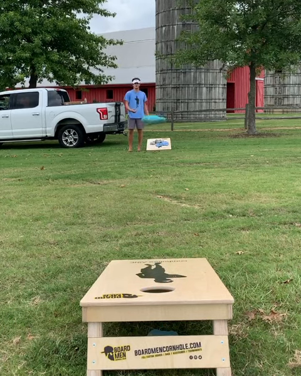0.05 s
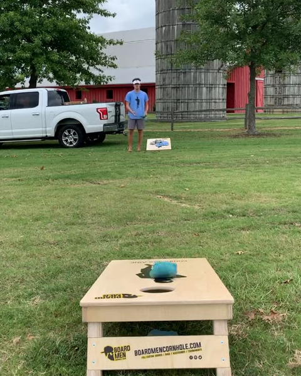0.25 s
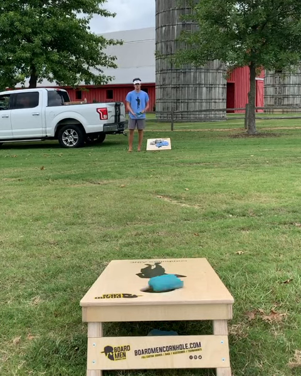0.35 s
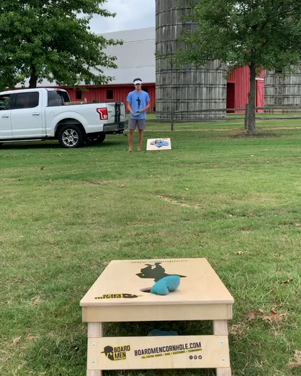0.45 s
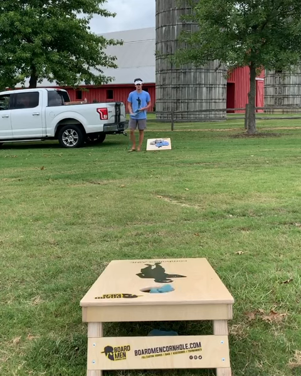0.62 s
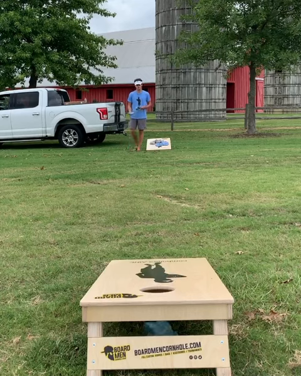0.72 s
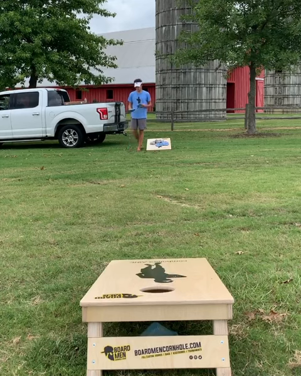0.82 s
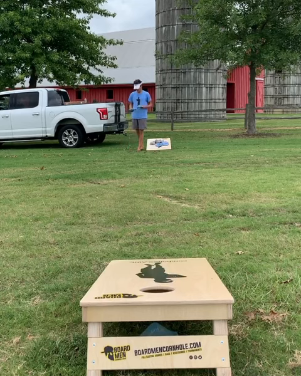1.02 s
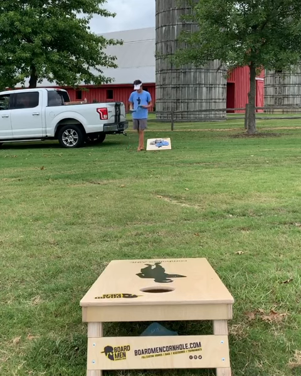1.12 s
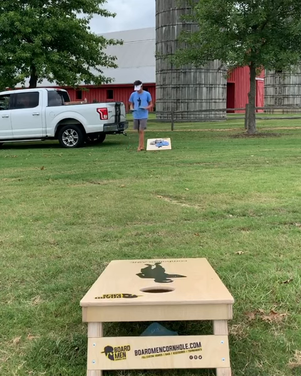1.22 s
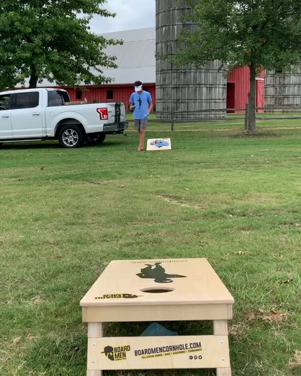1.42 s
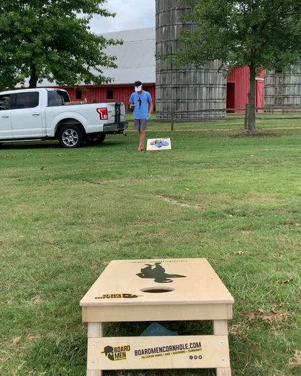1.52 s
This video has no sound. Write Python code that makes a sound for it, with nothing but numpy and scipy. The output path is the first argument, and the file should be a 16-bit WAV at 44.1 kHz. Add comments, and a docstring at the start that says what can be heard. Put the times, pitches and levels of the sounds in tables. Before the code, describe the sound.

A beanbag hits a nearby plywood board at about 0.25 seconds with a loud thud, a crack of pellets and a brief wooden ring. It skids quietly over the rim of the hole around 0.45 seconds and plops softly onto the grass near 0.8 seconds. Faint bird whistles, light wind on the microphone, a low hum and distant traffic continue until the end at about 1.5 seconds.

```python
"""Light wind and a far bird, then a thud: a beanbag lands on a plywood board on a lawn.
The pitch drops as the bag flattens, pellets crack, the wood rings and the board rocks on its legs.
The bag skids, rubs over the rim of the hole and plops to the ground beneath.
Behind it: bird whistles, wind on the microphone, a low hum, a thin whine and distant traffic."""
import sys
import numpy as np
from scipy import signal
from scipy.fft import rfft, irfft, next_fast_len
from scipy.io import wavfile
from scipy.ndimage import map_coordinates

SR = 44100
rng = np.random.default_rng(int(sys.argv[2]) if len(sys.argv) > 2 else 0)


def transcribe(signal):
    """Save signal, clipped to [-1, 1], as a 16-bit WAV file at the path in sys.argv[1]."""
    frames = np.atleast_2d(signal).T
    limited = np.clip(frames, -1, 1)
    pcm = np.round(limited * 32767).astype(np.int16)
    wavfile.write(sys.argv[1], SR, pcm)


N = 68355
HIT_S = .23916

# board modes: f/Hz, level/dB, t60/s
BOARD_MODES = [(156.9, -20.5, 0.22), (196.95, -21.5, 0.42), (269, -10, 0.073), (309.2, -14, 0.09),
               (495.6, -12, 0.088), (546, -18, 0.095), (730, -10, 0.037), (775, -13, 0.055),
               (862, -15.5, 0.061), (930, -20.5, 0.076), (989.5, -12, .055), (1481, -19, 0.045),
               (1700, -21.5, .025), (2022, -30.5, 0.057)]
# frame shudder: f/Hz, t60/s
FRAME_DECAY = [(100, 0.25), (300, 0.21), (900, 0.089), (2000, 0.023), (10000, 0.036)]
# pellet spectrum: f/Hz, level/dB
PELLET_SPECTRUM = [(1000, 7.5), (1900, 17.5), (2800, -22), (4100, 7), (4800, -23), (5500, 4), (7200, 0),
                   (10000, -4.5), (16000, -3.5)]
# spectrum of a loose corner brushing the board: f/Hz, level/dB
BRUSH_SPECTRUM = [(100, -13), (550, 21), (1300, -5), (2200, -1.5), (5000, -13), (16000, -50)]
# balance of the hit: f/Hz, left minus right/dB
HIT_BALANCE = [(120, 0), (400, 1), (750, 1), (1290, 1), (2300, 4.5), (4000, -3), (8000, 0), (15000, 4)]
# legs on turf: t/s, level/dB
LEG_KNOCKS = [(0.2636, -17), (0.2733, -18), (0.2843, -20)]
# skid, rim, landing, settling: peak t/s, 60 dB rise/s, t60/s, cloth level/dB, bump level/dB
BAG_RUBS = [(0.362, 0.75, 1, -64.5, -61.5), (0.437, 0.026, 0.13, -48, -47.5),
            (.446, 0.026, 0.086, -50, -38.5), (0.469, 0.095, 0.18, -53.5, -60.5),
            (0.759, 0.032, 0.21, -51.5, -56.5), (0.789, 0.099, 0.094, -43.5, -34),
            (1.04, 0.1, 0.24, -65, -57)]
# cloth hiss spectrum: f/Hz, level/dB
CLOTH_SPECTRUM = [(800, 6), (1800, 2), (2800, -5.5), (3800, 1.5), (4700, -10.5), (6200, 2.5), (9000, -8.5),
                  (11000, -0.5), (13000, -7.5), (15000, 1.5)]
# soft bump spectrum: f/Hz, level/dB
BUMP_SPECTRUM = [(40, -5.5), (70, 24), (200, 0), (500, -1.5), (800, 4), (1500, -54), (3000, -38.5)]
# stereo image of the bag: f/Hz, left-right correlation
BAG_COHERENCE = [(100, 0.98), (6000, 0.99), (10000, 0.77), (15000, 0.25)]
# bird notes: t/s, length/s, start f/Hz, end f/Hz, level/dB, echo re note/dB
BIRD_NOTES = [(0.071, 0.036, 5470, 5380, -57.5, -13), (0.089, 0.038, 5340, 4850, -61, -6),
              (0.126, 0.11, 4740, 3594, -60, -11), (0.484, 0.073, 2430, 2270, -58, -19),
              (0.606, 0.028, 3350, 2610, -56.5, -7), (0.624, 0.042, 2456, 2310, -56.5, -18),
              (1.065, 0.026, 3210, 3060, -63, -1), (1.116, 0.076, 2390, 2214, -54, -9),
              (1.134, 0.029, 3520, 3240, -59.5, -6.5), (1.189, 0.043, 2750, 2500, -58.5, 0),
              (1.378, .04, 2624, 2560, -64, -6), (1.474, .04, 2830, 2860, -68.5, -4)]
# yard echo: f/Hz, t60/s
YARD_DECAY = [(500, 0.44), (3000, 0.89), (6000, 0.9)]
# gusts: peak t/s, level/dB
WIND_GUSTS = [(.0, -38), (0.098, -34), (0.4, -49), (.49, -45.5), (0.602, -35), (.87, -53.5), (1.059, -40.5),
              (1.14, -42)]
# wind rumble spectrum: f/Hz, level/dB
WIND_SPECTRUM = [(20, -12.5), (62, 3), (90, -3), (150, -8), (230, -28.5), (500, -78), (2000, -104)]
# hum swells: t/s, gain/dB
HUM_GAIN = [(0, 3.5), (.55, 1.5), (.72, 6), (.92, 11.5), (.98, -3.5), (1.24, 5.5), (1.34, -4.5), (1.44, 0),
            (1.5, 8.5)]
# traffic drone spectrum: f/Hz, level/dB
DRONE_SPECTRUM = [(120, -22), (210, 0.5), (400, -8), (800, -28.5), (2000, -57)]
# traffic drone envelope: t/s, level/dB
DRONE_ENVELOPE = [(.18, -59.5), (.35, -55.5), (.68, -49), (.87, -52.5), (.98, -55.5), (1.19, -58),
                  (1.3, -55.5), (1.55, -59)]
# traffic wash spectrum: f/Hz, level/dB
WASH_SPECTRUM = [(450, -14.5), (650, 2.5), (900, 3.5), (1500, -6.5), (2200, -15.5), (3300, -17.5),
                 (4700, -30.5), (5600, -17), (8000, -27.5), (16000, -40.5)]
# stereo image of wind and traffic: f/Hz, left-right correlation
AIR_COHERENCE = [(180, 0.18), (550, 0.75), (1650, 0.75), (5000, 0.48), (15000, 0.16)]
# far whines: t/s, length/s, fundamental start f/Hz, end f/Hz, level/dB, tilt/(dB/octave)
WHINE_GLIDES = [(0.958, 0.17, 303, 307.3, -66, 6.5), (1.222, 0.219, 310, 339, -59, -11.5)]
# whine partials: harmonic number, gain before tilt/dB
WHINE_PARTIALS = [(3, 3), (4, -3.5), (5, 2), (6, -10)]


def thud(start_hz=1577, end_hz=222.8, fall_s=.00295, attack_s=.00018, hold_s=.01273, top_hz=2320):
    """The board's note falls as the bag flattens; the board sinks, modes ring, the frame shudders."""
    t = np.maximum(clock() - HIT_S, 0)
    pitch_hz = end_hz + (start_hz - end_hz) / (1 + t / fall_s) ** 2
    contact = 1 / (1 + (t / hold_s) ** 8)
    push = amp(-5) * contact * np.sin(2 * np.pi * np.cumsum(pitch_hz * (t > 0)) / SR)
    mic_t = t + .00006 * np.array([[1], [-1]])  # the ring reaches the two microphones apart
    ring = sum((-1) ** k * amp(db) * fade(t, t60_s) * np.sin(2 * np.pi * hz * mic_t)
               for k, (hz, db, t60_s) in enumerate(BOARD_MODES))
    sink = amp(-27.5) * fade(t, t60_s=.093) * np.sin(2 * np.pi * 81 * t)
    wood = -(push + ring + sink) * (1 - np.exp(-t / attack_s))
    wood = filtered(wood, lambda hz: 1 / (1 + (hz / top_hz) ** 10))  # a soft bag excites no treble
    delayed = np.interp(clock() - hold_s, clock(), wood.mean(axis=0))
    return wood + amp(-25) * diffuse(delayed, FRAME_DECAY)


def slap(delay_s=.00031, brush_rise_s=.041):
    """A loose corner brushes the board, then the pellets crack against it and settle."""
    t = clock() - HIT_S - delay_s
    crack = amp(-14) * fade(t, t60_s=.0076)
    settle = amp(-19.5) * fade(t, t60_s=.038)
    pellets = (crack + settle) * noise(PELLET_SPECTRUM, BAG_COHERENCE)
    brush = amp(-20.5) * fade(-t, brush_rise_s) * noise(BRUSH_SPECTRUM, BAG_COHERENCE)
    return np.where(t > 0, pellets, brush)


def legs(knock_hz=250, ring_hz=207):
    """The legs bump the turf: a soft push and a low ring each time."""
    out = np.zeros(N)
    for at_s, db in LEG_KNOCKS:
        t = clock() - at_s
        spread = (np.pi * knock_hz * t) ** 2
        push = (1 - 2 * spread) * np.exp(-spread)
        ring = fade(t, t60_s=.3) * np.sin(2 * np.pi * ring_hz * np.maximum(t, 0))
        out += amp(db) * (push + amp(-15) * ring)
    return out


def rubs(grain_db=.5, low_cut_hz=400):
    """Each rub swells and dies: grainy hiss of cloth and pellets over a soft bump."""
    t = clock()
    cloth = noise(CLOTH_SPECTRUM, BAG_COHERENCE)
    cloth = filtered(cloth, lambda hz: hz ** 2 / (hz ** 2 + low_cut_hz ** 2))
    cloth = unit_rms(cloth * amp(grain_db * wobble(rate_hz=260)))
    bump = noise(BUMP_SPECTRUM, BAG_COHERENCE)
    out = np.zeros((2, N))
    for peak_s, rise_s, t60_s, cloth_db, bump_db in BAG_RUBS:
        envelope = fade(peak_s - t, rise_s) * fade(t - peak_s, t60_s)
        out += envelope * (amp(cloth_db) * cloth + amp(bump_db) * bump)
    return out


def birds():
    """Gliding whistles; the farther the bird, the more echo from barn and trees."""
    out = np.zeros((2, N))
    for *note, echo_db in BIRD_NOTES:
        whistle = glide(*note, partials=[(1, 0)], waver=.008)
        out += whistle + amp(echo_db) * diffuse(whistle, YARD_DECAY)
    return out


def wind(breeze_db=-44, gust_half_s=.036, balance_db=.5):
    """Rumble on the microphone: short gusts over a steady breeze."""
    gusts = sum(amp(db) * np.exp(-((clock() - at_s) / gust_half_s) ** 2) for at_s, db in WIND_GUSTS)
    return (amp(breeze_db) + gusts) * noise(WIND_SPECTRUM, AIR_COHERENCE) * pan(balance_db)


def hum(pitch_hz=127, base_db=-50.5, waver=.0314, swing_db=1):
    """A low tone that wavers and swells."""
    cycles = np.cumsum(pitch_hz * (1 + waver * wobble(rate_hz=7.71))) / SR
    tone = amp(swing_db * wobble(rate_hz=13.1)) * np.sin(2 * np.pi * cycles)
    return amp(base_db) * gain_curve(HUM_GAIN) * unit_rms(tone)


def traffic_drone():
    """Far traffic, low band: slowly swelling noise."""
    return gain_curve(DRONE_ENVELOPE) * noise(DRONE_SPECTRUM, AIR_COHERENCE)


def traffic_wash(level_db=-58, flutter_db=3.18):
    """Far traffic, middle band: fluttering noise."""
    return amp(level_db + flutter_db * wobble(rate_hz=9.58)) * noise(WASH_SPECTRUM, AIR_COHERENCE)


def whines():
    """Thin, far-off rising tones: upper harmonics only."""
    out = np.zeros(N)
    lowest = WHINE_PARTIALS[0][0]
    for *note, db_per_octave in WHINE_GLIDES:
        partials = [(k, db + db_per_octave * np.log2(k / lowest)) for k, db in WHINE_PARTIALS]
        out += glide(*note, partials=partials, waver=.002)
    return out


def glide(at_s, length_s, start_hz, end_hz, level_db, partials, waver):
    """An unsteady gliding tone that swells and fades."""
    drift = 1 + waver * wobble(rate_hz=150)
    progress = np.clip((clock() - at_s) / length_s, 0, 1)
    pitch_hz = start_hz * (end_hz / start_hz) ** progress * drift
    phase = 2 * np.pi * np.cumsum(pitch_hz) / SR
    return np.sin(np.pi * progress) * sum(amp(level_db + db) * np.sin(k * phase) for k, db in partials)


def noise(spectrum, coherence):
    """Coloured stereo noise, rms 1."""
    def response(hz):
        angle = np.arccos(np.clip(log_interp(coherence, hz), -1, 1)) / 2
        return amp(log_interp(spectrum, hz)) * [np.cos(angle), np.sin(angle)]
    mid, side = filtered(rng.standard_normal((2, N)), response)
    return unit_rms(np.array([mid + side, mid - side]))


def diffuse(x, decay):
    """Dense stereo tail of x, t60 set per frequency."""
    hz, t, bins = signal.stft(rng.standard_normal((2, SR // 2)), SR, nperseg=256)
    mid, side = signal.istft(bins * fade(t, log_interp(decay, hz)[:, None]), SR, nperseg=256)[1]
    tail = np.array([mid + side / 2, mid - side / 2])
    return signal.fftconvolve(x[None], tail / np.linalg.norm(tail[0]), axes=1)[:, :N]


def filtered(x, response):
    size = next_fast_len(N + SR // 2)
    return irfft(rfft(x, size) * response(np.fft.rfftfreq(size, 1 / SR)), size)[..., :N]


def wobble(rate_hz):
    """Smooth random curve."""
    return map_coordinates(rng.standard_normal(512), [clock() * rate_hz], mode="wrap")


def log_interp(points, hz):
    knots_hz, values = np.transpose(points)
    return np.interp(np.log(hz + 1), np.log(knots_hz + 1), values)


def gain_curve(points):
    return amp(np.interp(clock(), *np.transpose(points)))


def fade(t, t60_s):
    return np.exp(-np.log(1000) * np.maximum(t, 0) / t60_s)


def pan(balance_db):
    return amp(np.array([[.5], [-.5]]) * balance_db)


def amp(db):
    return 10 ** (np.asarray(db) / 20)


def unit_rms(x):
    return x / np.sqrt(np.mean(x ** 2) + 1e-20)


def clock():
    return np.arange(N) / SR


def scene():
    hit = filtered(thud() + slap(), lambda hz: pan(log_interp(HIT_BALANCE, hz)))
    bag = hit + legs() + rubs()
    return bag + birds() + traffic_drone() + whines() + wind() + hum() + traffic_wash()


def record(dry, ceiling=.87, top_hz=16300):
    """Soft peak limit, then a steep low-pass."""
    rounded = dry / (1 + np.abs(dry / ceiling) ** 10) ** (1 / 10)
    return filtered(rounded, lambda hz: 1 / (1 + (hz / top_hz) ** 100))


dry = scene()
out = record(dry)
transcribe(out)
```